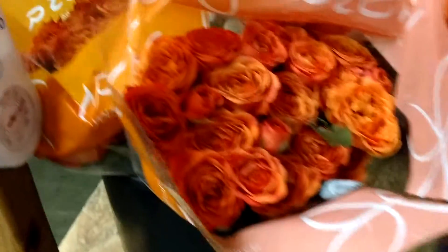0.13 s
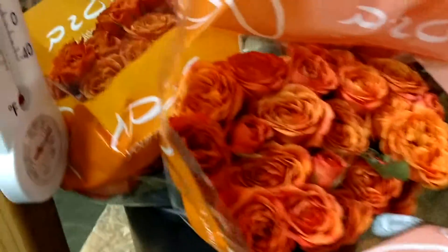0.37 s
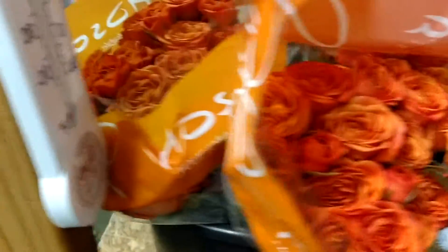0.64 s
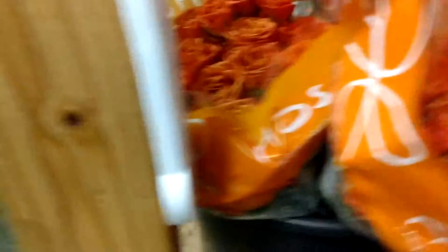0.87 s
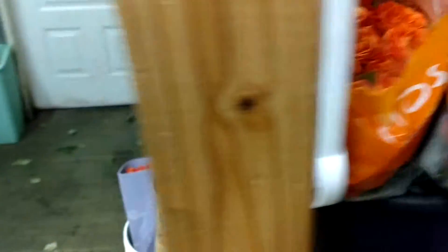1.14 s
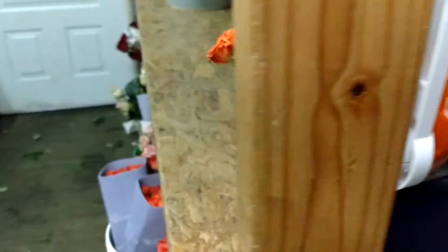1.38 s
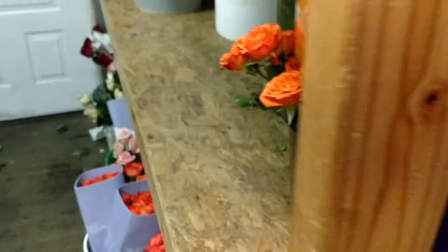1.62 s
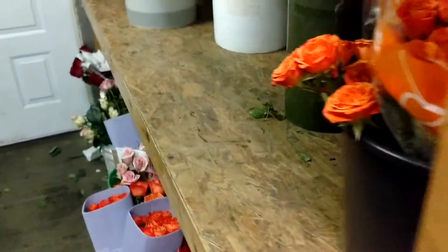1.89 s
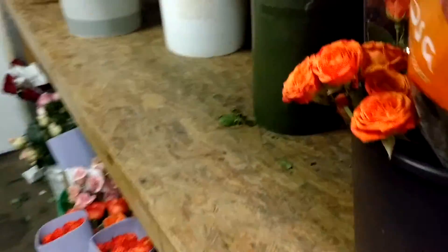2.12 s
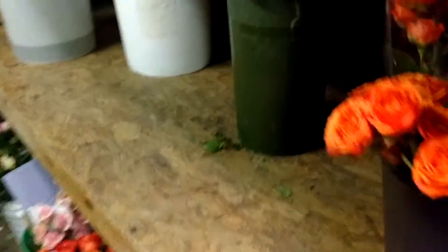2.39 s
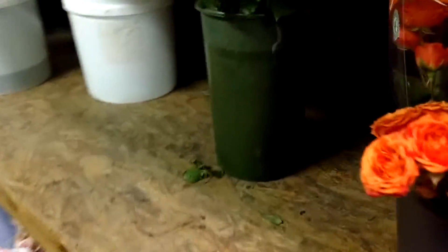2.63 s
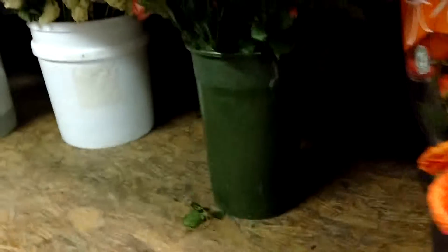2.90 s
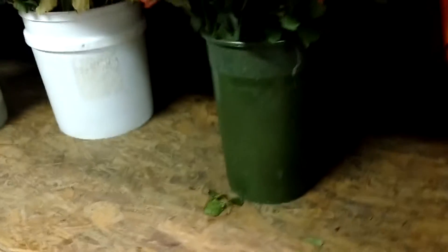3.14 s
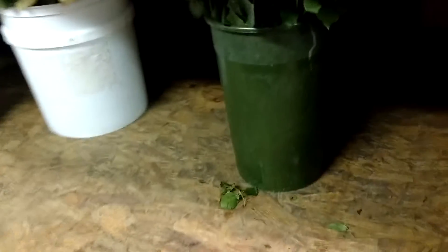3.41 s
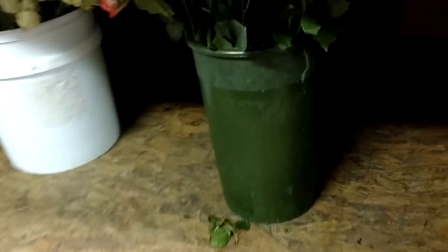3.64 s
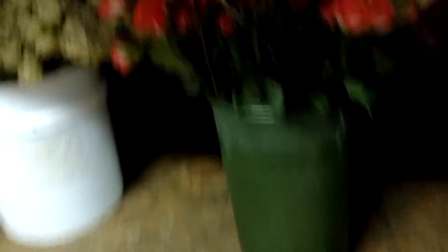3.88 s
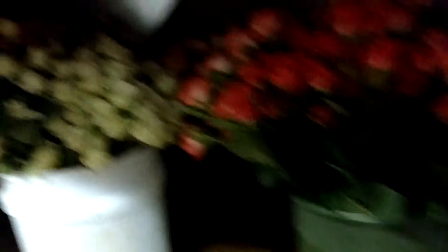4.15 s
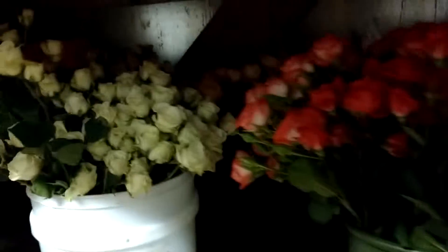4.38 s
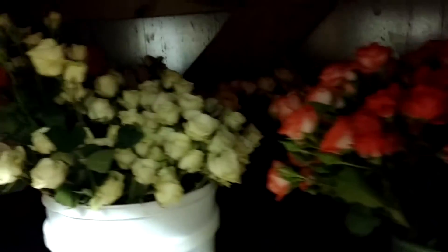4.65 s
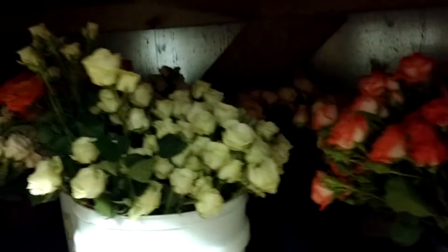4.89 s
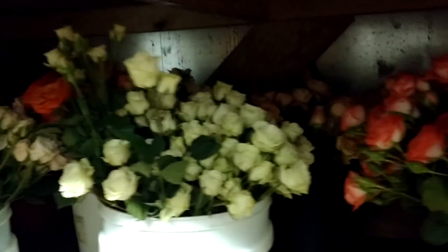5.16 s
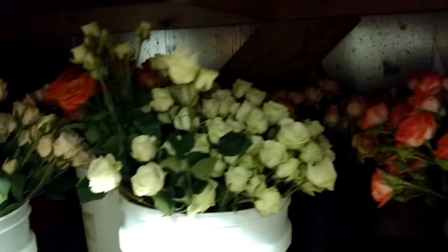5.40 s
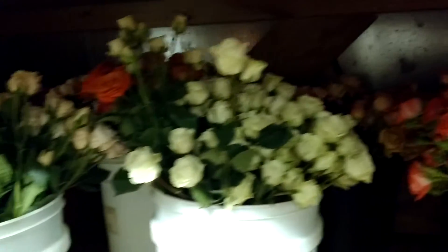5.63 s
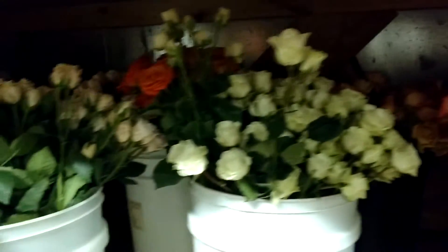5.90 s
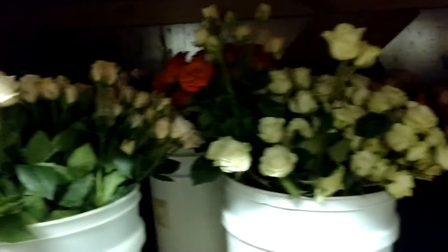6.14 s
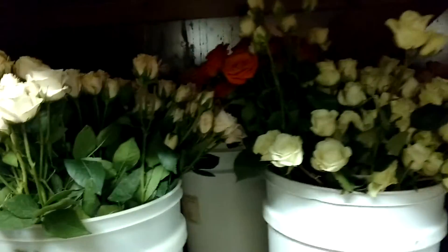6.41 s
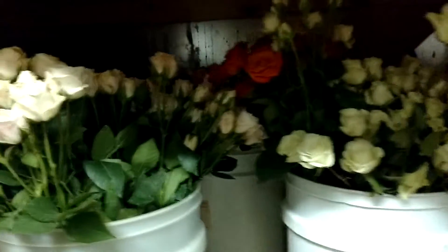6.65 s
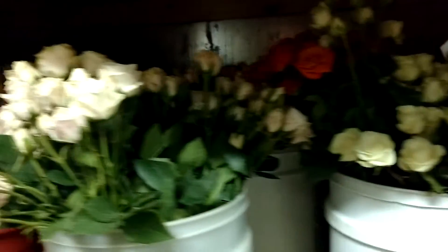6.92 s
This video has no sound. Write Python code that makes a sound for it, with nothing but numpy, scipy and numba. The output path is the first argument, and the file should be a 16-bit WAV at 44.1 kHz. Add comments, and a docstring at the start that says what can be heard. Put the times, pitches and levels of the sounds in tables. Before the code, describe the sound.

From 0 s, walk-in cooler fans run without pause: a deep mains-like hum, nearby blade tones beating about once a second, and faint higher tones wavering in turbulence. Broad air whoosh dominates with a softer, dull hiss above. As the handheld recorder moves past the flower shelves, the hum leans right, strongest around 2-3 s, while its left side nearly vanishes, then returns after 4 s. Faint finger touches are scattered throughout. At 2.8 s a hard, close casing thump with a small click dips the background, which recovers gradually. A clickier double knock comes at 3.2 s. From 3.8 to 4.1 s soft bumps and skin rustle cluster, with another tap at 4.45 s and a very faint one near 5.1 s. At 6.54 s an enormous thud and sharp nail snap overload the microphone; the fans plunge far down and remain quiet until the end at 7 s.

```python
"""Evaporator fans run in a walk-in cooler: steady motor hum, beating blade tones and wavering higher tones, all sines.
Moving air adds whoosh and hiss, made of coloured noise; a handheld recorder is carried along the shelves.
Fingers touch and knock its casing (pushes and decaying modes), skin rustles (noise puffs), nails snap on its shell.
The recorder's stereo widening makes the left channel's air a largely inverted, late, duller copy of the right.
Its gain control ducks after the hard knocks."""
import sys
import numpy as np
from scipy import signal
from scipy.fft import rfft, irfft, next_fast_len
from scipy.io import wavfile
from scipy.ndimage import uniform_filter1d, minimum_filter1d
from numba import njit

SR = 44100
rng = np.random.default_rng(int(sys.argv[2]) if len(sys.argv) > 2 else 0)


def unload_wav(signal):
    """Save mono or channel-first audio to the path in sys.argv[1] as 16-bit WAV at rate SR, clipped to [-1, 1]."""
    wavfile.write(
        sys.argv[1],
        SR,
        np.round(np.clip(np.atleast_2d(signal).T, -1, 1) * 32767).astype(np.int16),
    )


def voltage_ratio(level):
    """Linear amplitude factor for a level in decibels (scalar or array-like)."""
    return 10 ** (np.asarray(level, float) / 20)


N = 310023  # samples, about 7.03 s


def rms_one(x):
    """Scales a signal to an rms of 1."""
    return x / np.sqrt(np.mean(x ** 2) + 1e-20)


def in_time(rows):
    """Draws straight lines between the rows of a table whose first column is time in seconds."""
    s, *columns = np.transpose(rows)
    return [np.interp(np.arange(N) / SR, s, column) for column in columns]


def drift(rate_hz):
    """Slow chance: noise at every 40th sample through a double one-pole low-pass, scaled to rms 1."""
    r = np.exp(-2 * np.pi * rate_hz * 40 / SR)
    noise = rng.standard_normal(N // 40 + 2002)
    slow = signal.lfilter([1], [1, -2 * r, r * r], noise)[2000:]  # drop the filter's start
    return np.interp(np.arange(N) / 40, np.arange(len(slow)), rms_one(slow))


def delayed(x, lag_s):
    """The same sound, lag_s seconds later."""
    return np.interp(np.arange(N) - lag_s * SR, np.arange(N), x)


WIDENING_LAG_S = 0.0004673


def widened_left(x):
    """The recorder's stereo widening gives the left channel an inverted, late copy of the right."""
    return -delayed(x, WIDENING_LAG_S)


HUM_HZ = 119.95
# Motor hum as the recorder moves through standing waves; the left side crosses a node:
# (time [s], left level [dB rms], right level [dB rms], left phase lead [rad])
HUM_WALK = [(0.0, -22, -23, 0.5), (0.5, -24.5, -20.5, 0.5), (1.2, -26.5, -17, -1), (2.0, -30.5, -15.5, -1),
            (2.6, -44, -15, -3), (3.6, -42, -18, -5), (4.25, -31.5, -17, -3), (4.7, -28, -17.5, -3.5),
            (5.6, -25.5, -18.5, -3.5), (7.03, -28, -21.5, -2.5)]


def motor_hum():
    """The mains hum of the motors is one steady sine whose level and phase differ between the channels."""
    left_db, right_db, lead = in_time(HUM_WALK)
    phase = 2 * np.pi * HUM_HZ * np.arange(N) / SR
    left = voltage_ratio(left_db) * np.sin(phase + lead)
    right = voltage_ratio(right_db) * np.sin(phase)
    return np.sqrt(2) * np.array([left, right])


SLOW_BLADE_HZ, BEAT_HZ = 139.85, 1.04  # the faster fan's tone lies one beat rate higher
CANCEL_AT_S = 5.72  # one moment at which the two tones oppose each other
# Blade tones along the walk:
# (time [s], slow fan level [dB rms], fast fan level [dB rms], left minus right [dB], left phase lead [rad])
BLADE_WALK = [(0.0, -51, -46, 3, 4), (0.35, -53, -47, -4, -2.5), (0.75, -43, -31.5, 0, 0.5),
              (1.5, -54, -26, -18, 4.5), (2.7, -39, -37, -13, -2.5), (4.3, -35.5, -31.5, -9, 2),
              (5.3, -35.5, -30, -3.5, 2), (7.03, -34, -35, -12, 4)]


def blade_tones():
    """Two fans at slightly different speeds: their blade tones beat, in opposite phase once a beat."""
    slow_db, fast_db, left_db, lead = in_time(BLADE_WALK)
    t = np.arange(N) / SR
    pair = voltage_ratio(slow_db) - voltage_ratio(fast_db) * np.exp(2j * np.pi * BEAT_HZ * (t - CANCEL_AT_S))
    right = np.sqrt(2) * pair * np.exp(2j * np.pi * SLOW_BLADE_HZ * t)
    left = voltage_ratio(left_db) * np.exp(1j * lead) * right
    return np.imag([left, right])


PHASE_WANDER_RAD, WAVER_HZ = 1.8, 3.25
# Higher fan tones: (frequency [Hz], five columns of level at evenly spaced moments of the walk [dB],
# left minus right [dB], level waver [dB], rate of the phase wander [Hz])
HIGH_TONES = [(148.6, -37, -45, -42, -37, -30, -8.5, 1.6, 1.4),
              (261.7, -41, -40, -40.5, -42.5, -39, -9.5, 2.3, 2.4),
              (280.2, -39, -36, -43, -37.5, -37, -9, 3, 2.06),
              (282, -40.5, -42.5, -41, -39, -33, -8, 2.1, 1.9),
              (303, -37.5, -39, -50.5, -49, -54, -6.5, 4.2, 6.7),
              (403, -37.5, -43.5, -48, -47, -49, -6, 2.2, 10.4),
              (421.7, -36, -41, -40.5, -37, -34, -9.5, 5.1, 7.7),
              (512.8, -39, -42, -41, -46, -42, -2.5, 3, 3.2),
              (563, -46, -51.5, -43.5, -39, -46, -4.5, 2.7, 2.9),
              (564.4, -43, -50, -44, -41.5, -40, -5, 3.1, 1.77),
              (704, -34, -50, -55, -42.5, -46, -3, 1.1, 4.5),
              (741.5, -47, -51, -43.5, -48, -52, -2.5, 4, 4.7),
              (1026, -59, -55, -51.5, -53.5, -50, -2, 4, 11.2)]


def overtones():
    """Higher fan tones are sines that waver in level and phase with the turbulence."""
    out = np.zeros((2, N))
    for hz, *walk_db, left_db, waver_db, blur_hz in HIGH_TONES:
        level_db = np.interp(np.arange(N), np.linspace(0, N, len(walk_db)), walk_db)
        phase = 2 * np.pi * hz * np.arange(N) / SR + rng.uniform(0, 2 * np.pi)
        phase += PHASE_WANDER_RAD * drift(blur_hz)
        wavering_db = level_db + waver_db * drift(WAVER_HZ)
        wave = np.sqrt(2) * voltage_ratio(wavering_db) * np.sin(phase)
        out += [voltage_ratio(left_db) * widened_left(wave), wave]
    return out


SPLIT_HZ = 1740  # whoosh below, hiss above
# Moving air along the walk: (time [s], whoosh level [dB], whoosh left minus right [dB], hiss level [dB])
AIR_WALK = [(0.0, -29, -1.5, -41), (0.5, -29, -1, -40.5), (1.0, -30, -0.5, -42), (1.9, -32, -1, -43.5),
            (2.5, -30.5, -2, -42.5), (3.1, -29.5, 0, -43.5), (3.7, -30.5, -3, -44), (4.3, -28, -2.5, -42.5),
            (5.2, -29.5, -2, -42), (5.8, -29.5, -2.5, -41.5), (6.3, -29, -1.5, -42), (7.03, -30.5, -2, -41)]
# Colour of the air before whoosh and hiss are levelled: (frequency [Hz], right density [relative dB per Hz],
# left minus right [dB], likeness of the channels [0-1], extra left lag [rad])
AIR_COLOUR = [(25, -35, 7, 1, -6), (46, -32, 10.5, 0.76, 1.5), (72.4, -16, 11, 0.8, 0),
              (99, 0.5, -5, 1, 0.1), (157, 5, -4, 0.1, 0.5), (187, -6.5, 0, 0.75, 4.5),
              (320, -3, -5, 0.75, 2.5), (408, -3, 1.5, 0.64, 1), (595, -4.5, -1.5, 1, 2),
              (892, -6.5, 1.5, 1, -1.03), (1625, -17, -1.5, 0.99, 0), (2200, -21.5, -0.5, 1, 0),
              (3200, -27.5, -2.5, 1, 0), (4600, -30, -2, 0.99, 0), (7000, -33, -1.5, 1, 0),
              (9860, -34, -17, 0.25, 1.5), (16000, -41.5, -16.5, 0.8, -4)]


def air(flicker_db):
    """Turbulence: coloured noise, partly shared by the channels, split into flickering whoosh and hiss."""
    size = next_fast_len(N)
    hz = np.maximum(np.arange(size // 2 + 1) * SR / size, 1)
    table_hz, *columns = np.transpose(AIR_COLOUR)
    right_db, balance_db, alike, lag = [np.interp(np.log(hz), np.log(table_hz), c) for c in columns]
    alike = np.clip(alike, 0, 1)
    shared, own = rfft(rng.standard_normal((2, size)))
    late = -np.exp(-2j * np.pi * hz * WIDENING_LAG_S - 1j * lag)  # the widening again, with its extra lag
    left = voltage_ratio(balance_db) * (alike * late * shared + np.sqrt(1 - alike ** 2) * own)
    both = voltage_ratio(right_db) * np.array([left, shared])
    low_share = 1 / (1 + (hz / SPLIT_HZ) ** 4)
    whoosh = irfft(both * low_share, size)[:, :N]
    hiss = irfft(both * (1 - low_share), size)[:, :N]
    whoosh_db, left_db, hiss_db = in_time(AIR_WALK)
    whoosh *= voltage_ratio(whoosh_db + flicker_db * drift(8.9)) / np.std(whoosh[1])
    whoosh[0] *= voltage_ratio(left_db)
    hiss *= voltage_ratio(hiss_db + 0.51 * flicker_db * drift(16)) / np.std(hiss[1])
    return whoosh + hiss


TOUCH_COUNT, TOUCH_DB, TOUCH_SPREAD_DB, TOUCH_MS = 9, -27, 3.5, 5.5  # faint finger touches
# Knocks on the casing: (time [s], jolt peak [dB], jolt width [ms], ring strength [dB])
KNOCK_TIMES = [(2.779, -18, 4, -21), (2.789, -14, 4, -17), (2.800, -12, 3, -11), (2.811, 8.5, 1.3, -9),
               (3.075, -20, 4, -20), (3.093, -16, 4, -16), (3.2077, -9, 1.1, -14), (3.2094, -3, 3.6, -5),
               (3.221, -8, 2.5, -14), (3.230, -10, 2, -17), (3.815, -20, 3, -19), (3.925, -20, 4, -19),
               (3.968, -16, 4, -17), (4.015, -19, 4, -17), (4.052, -20, 3, -16), (4.089, -16, 3, -14),
               (4.1, -14, 2.5, -14), (4.113, -15, 3, -14), (4.451, -12, 3, -14), (5.072, -22, 4, -22),
               (6.538, -20, 2.5, -12), (6.5425, -3, 1.8, -10), (6.5452, 33.5, 1.7, -6)]
# The grip tugs at the casing, against the direction of a knock:
# (time [s], jolt peak [dB], jolt width [ms], ring strength [dB])
GRIP_TUGS = [(2.806, -10, 4.5, -18), (2.8133, 3.5, 5.3, -25), (3.2035, -3, 2.9, -23), (3.2105, -23, 6, -30),
             (6.5397, -9, 6.6, -14), (6.546, 5, 4.2, -17)]


def contacts():
    """Knocks and tugs at set times, and faint touches at random moments: s, jolt dB, ms, ring dB, direction."""
    when, size = rng.random(TOUCH_COUNT), rng.standard_normal(TOUCH_COUNT)
    touch_s = (0.02 + 0.9 * when) * N / SR
    touch_db = TOUCH_DB + TOUCH_SPREAD_DB * size
    touches = np.array([touch_s, touch_db, np.full(TOUCH_COUNT, TOUCH_MS), touch_db])
    direction = np.repeat([1, -1, 1], [len(KNOCK_TIMES), len(GRIP_TUGS), TOUCH_COUNT])
    events = np.hstack([np.transpose(KNOCK_TIMES), np.transpose(GRIP_TUGS), touches])
    return np.vstack([events, direction])


KNOCK_LEFT_DB, KNOCK_RIGHT_LAG_S = 0.5, 0.00042  # the hand is nearer the left microphone
# Modes of casing and hand: (frequency [Hz], level added to ring strength [dB], decay by 60 dB [s])
CASING_MODES = [(52.3, -32, 0.044), (75, -17, 0.21), (105.4, 1, 0.095), (166, -7.5, 0.15),
                (239, -5.5, 0.13), (322, -5.5, 0.048), (460, -13, 0.055), (664, -23, 0.071),
                (1172, -30.5, 0.051)]


def knocks(hand):
    """A contact is a short push plus casing modes, driving the two channels in opposite directions."""
    s, jolt_db, width_ms, ring_db, direction = hand
    sides = np.array([[-voltage_ratio(KNOCK_LEFT_DB / 2)], [voltage_ratio(-KNOCK_LEFT_DB / 2)]])
    out, scatter = np.zeros((2, N)), rng.standard_normal((len(s), len(CASING_MODES), 2))
    for k in range(len(s)):
        away = (np.arange(-400, 400) / SR * 1000) / width_ms[k]
        at = round(s[k] * SR)
        out[:, at - 400:at + 400] += direction[k] * sides * voltage_ratio(jolt_db[k]) * np.exp(-8 * away ** 2)
    for m, (hz, level_db, t60) in enumerate(CASING_MODES):
        clicks = np.zeros((2, N)) + 1e-18
        late_s = np.abs(scatter[:, m, 0]) * 0.31 / hz  # modes start out of step
        at = np.round((s + late_s) * SR).astype(int)
        strength = voltage_ratio(ring_db + level_db + 2.5 * scatter[:, m, 1])
        clicks[:, at] = direction * sides * strength * (-1) ** m
        r, w = voltage_ratio(-60 / (t60 * SR)), 2 * np.pi * hz / SR
        out += signal.lfilter([0, np.sin(w)], [1, -2 * r * np.cos(w), r * r], clicks)
    out[1] = delayed(out[1], KNOCK_RIGHT_LAG_S)
    return out


def rustle(hand, level_db, t60, low_hz, cut_hz):
    """Every contact also shakes loose a short noise that reaches the microphones through the air."""
    s, ring_db = hand[[0, 3]]
    starts = np.zeros(N)
    starts[np.round(s * SR).astype(int)] = voltage_ratio(ring_db + level_db)
    fading = signal.lfilter([1], [1, -voltage_ratio(-60 / (t60 * SR))], starts + 1e-18)
    band = signal.butter(2, [low_hz, cut_hz], "band", fs=SR, output="sos")
    steady, puffs = signal.sosfilt(band, rng.standard_normal(N) * [np.ones(N), fading])
    puffs = puffs / np.std(steady)  # steady noise in this band would have rms 1
    return np.array([widened_left(puffs), puffs])


SNAP_RIGHT_DB, SNAP_RIGHT_CUT_HZ, SNAP_RIGHT_LAG_S = 1, 3000, 0.00035
# Fingernail snaps on the shell beside the left microphone:
# (time [s], level [dB], sharpness added to every mode but the first [dB])
NAIL_SNAPS = [(2.8108, -26, 9), (3.2073, -17, 1), (3.2080, -4, -5), (3.2222, -24, -6), (3.2298, -22, -2),
              (4.101, -25, -4), (6.5457, 0, 17)]
# The shell's short bright ring: (frequency [Hz], level added to the snap [dB], decay by 60 dB [s])
SHELL_MODES = [(900, 0, .008), (2900, -19, .004), (5600, -22, .003), (10500, -24, .002)]


def nail_snaps():
    """A snap is a sudden step that rings the shell briefly; in the right channel it is inverted, late, duller."""
    s, level_db, sharp_db = np.transpose(NAIL_SNAPS)
    left = np.zeros(N)
    for m, (hz, mode_db, t60) in enumerate(SHELL_MODES):
        clicks = np.zeros(N) + 1e-18
        clicks[np.round(s * SR).astype(int)] = voltage_ratio(level_db + mode_db + sharp_db * (m > 0))
        r, w = voltage_ratio(-60 / (t60 * SR)), 2 * np.pi * hz / SR
        left += signal.lfilter([1, -r * np.cos(w)], [1, -2 * r * np.cos(w), r * r], clicks)
    dull = signal.sosfilt(signal.butter(2, SNAP_RIGHT_CUT_HZ, fs=SR, output="sos"), left)
    return np.array([left, -voltage_ratio(SNAP_RIGHT_DB) * delayed(dull, SNAP_RIGHT_LAG_S)])


def scene():
    """Fan tones and air in the cooler, with the hand on the recorder's casing."""
    fans = motor_hum() + blade_tones() + overtones()
    hand = contacts()
    skin = rustle(hand, level_db=-16.5, t60=0.15, low_hz=250, cut_hz=854)
    skin += rustle(hand, level_db=-24.0, t60=0.05, low_hz=920, cut_hz=1570)
    return fans + air(flicker_db=1.0) + knocks(hand) + skin + nail_snaps()


CEILING_DB = -0.7
RELEASE_DB_S, RELEASE_SHARE = 7.0, 0.42  # recovery: dB per second, plus a share of the cut per second
JUMP_SHARE, SLIDE_S = 0.36, 0.07  # this share of the cut comes at once, the rest slides in
GUARD_S, LOW_CUT_HZ = 0.0006, 22  # span of the limiter; corner of the low cut


@njit
def ducking(over_db, release_db, share, jump, slide):
    """The wanted cut follows overloads, recovering faster when deep; gain jumps part way, then falls in a line."""
    out, held, gain = np.zeros(len(over_db)), 0., 1.
    for i in range(len(over_db)):
        held = max(held - release_db - share * held, over_db[i], 0.)
        first = 10 ** (-jump * held / 20)
        gain = max(10 ** (-held / 20), min(gain, first) - slide * first)
        out[i] = -20 * np.log10(gain)
    return out


def top_cut(x):
    """Nothing passes above the cut-off."""
    return signal.sosfilt(signal.butter(12, 16020, fs=SR, output="sos"), x)


def record(dry):
    """Gain control shared by both channels, a quick look-ahead limiter for the peaks it misses, a low cut."""
    over_db = 20 * np.log10(np.abs(dry).max(axis=0) + 1e-9) - CEILING_DB
    cut_db = ducking(over_db, RELEASE_DB_S / SR, RELEASE_SHARE / SR, JUMP_SHARE, 1 / (SLIDE_S * SR))
    span = round(GUARD_S * SR)
    missed_db = np.minimum(cut_db - over_db, 0)
    guard_db = uniform_filter1d(minimum_filter1d(missed_db, size=span), size=span // 2)
    low_cut = signal.butter(2, LOW_CUT_HZ, "high", fs=SR, output="sos")
    mix = signal.sosfilt(low_cut, dry * voltage_ratio(guard_db - cut_db))
    return top_cut(mix)


dry = scene()
out = record(dry)
unload_wav(out)
```